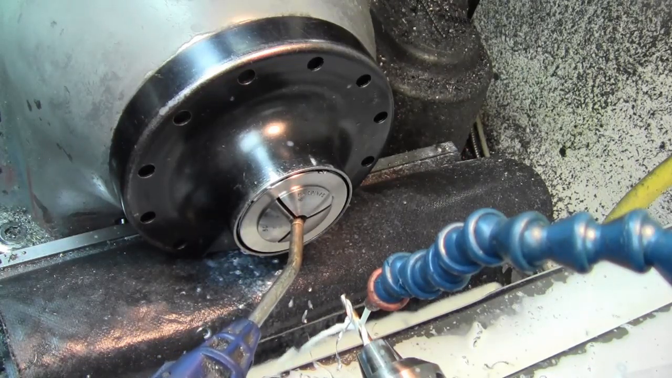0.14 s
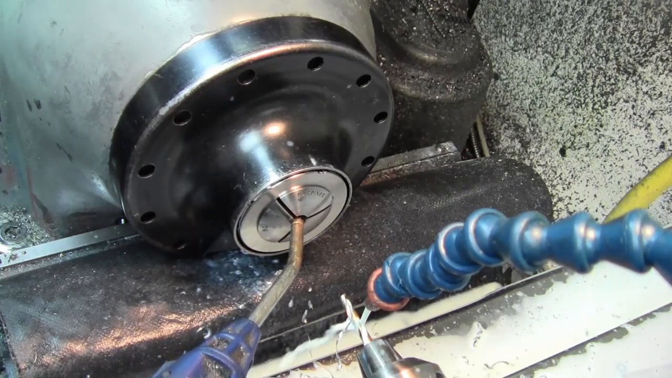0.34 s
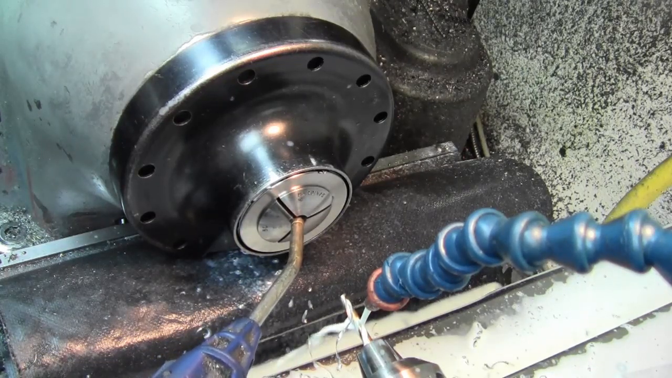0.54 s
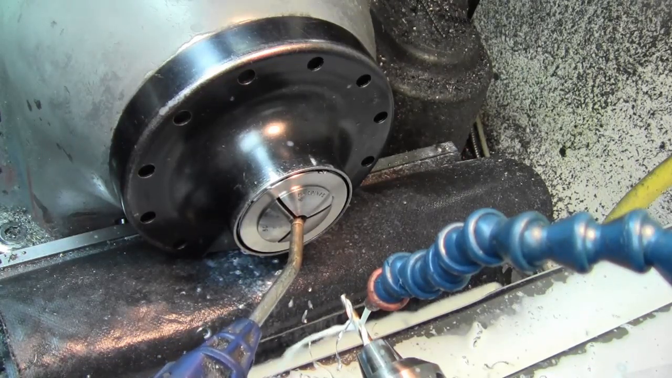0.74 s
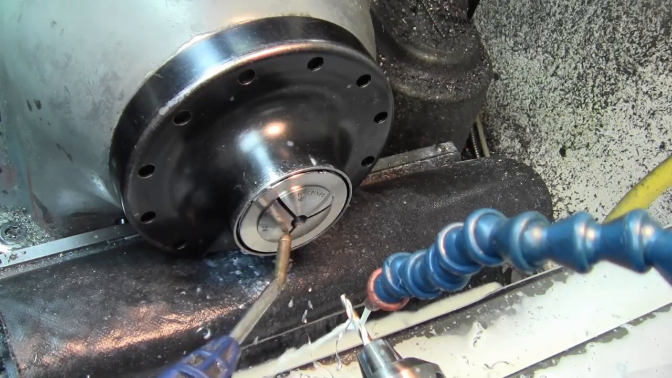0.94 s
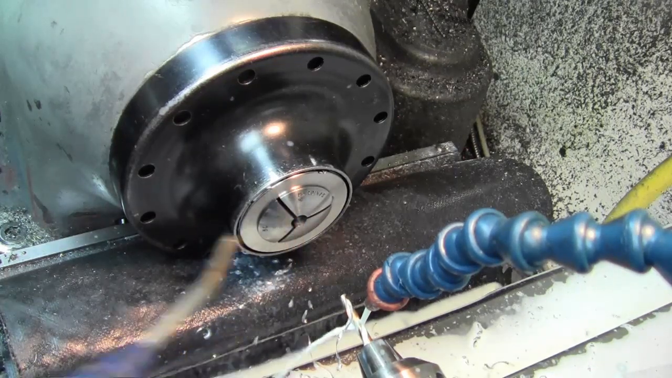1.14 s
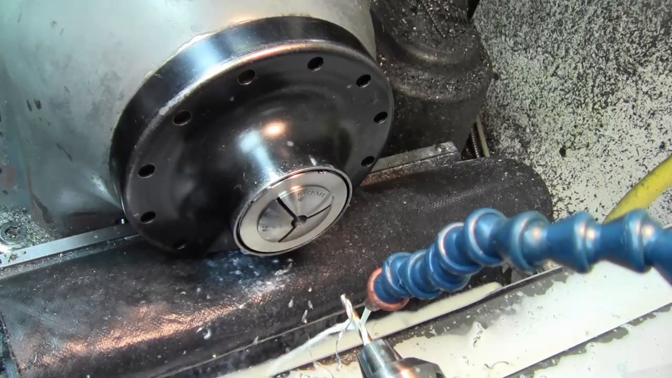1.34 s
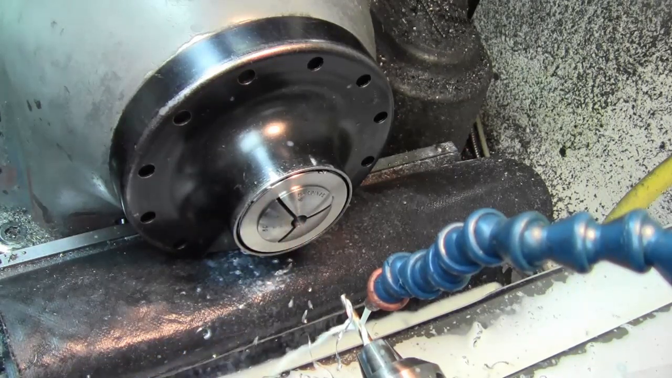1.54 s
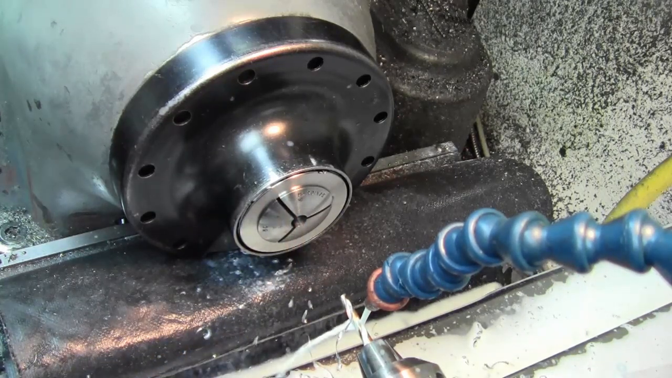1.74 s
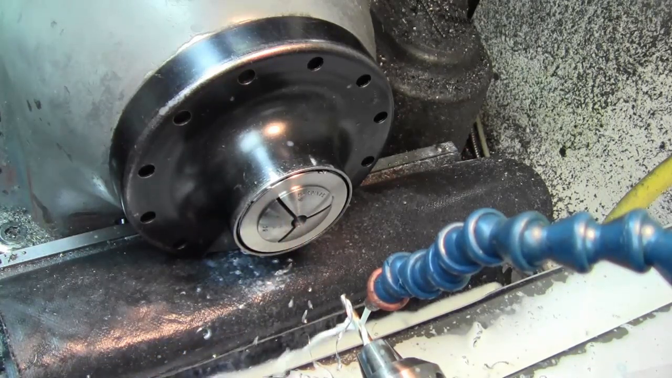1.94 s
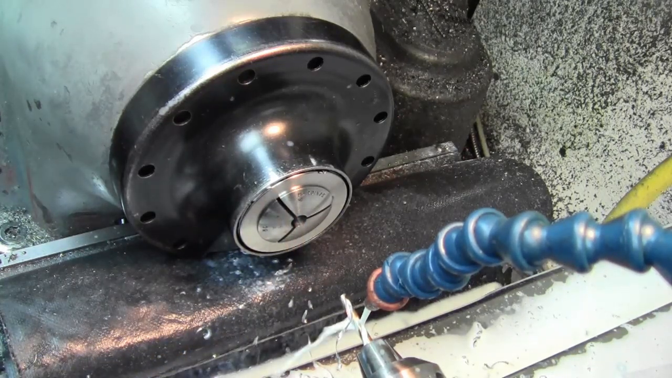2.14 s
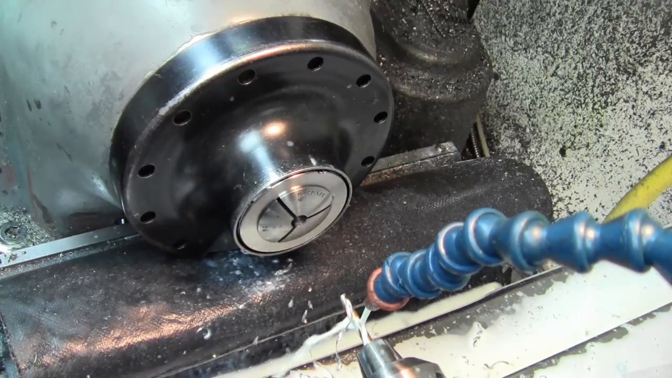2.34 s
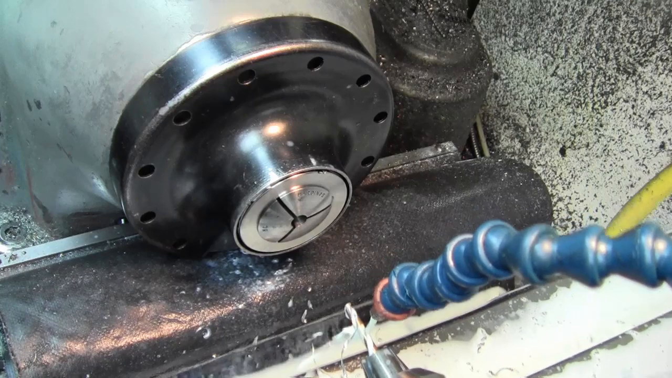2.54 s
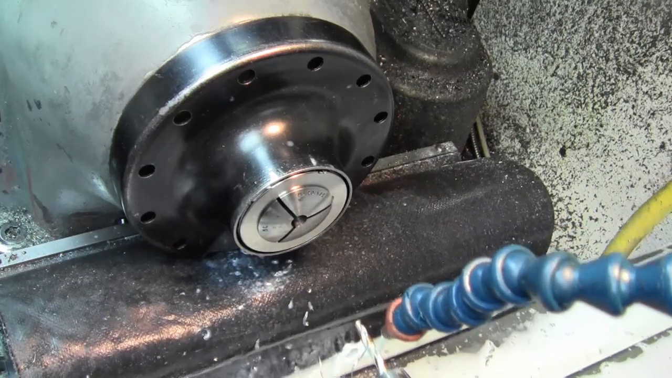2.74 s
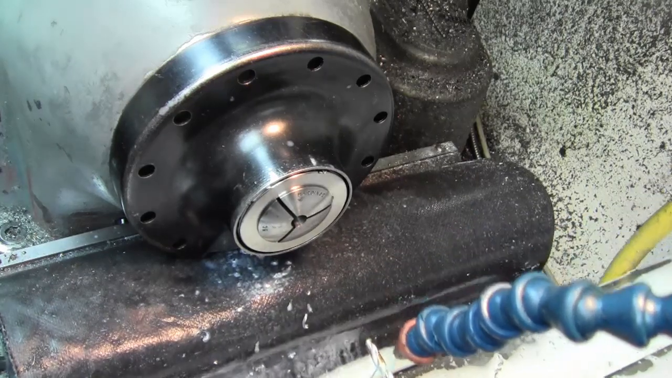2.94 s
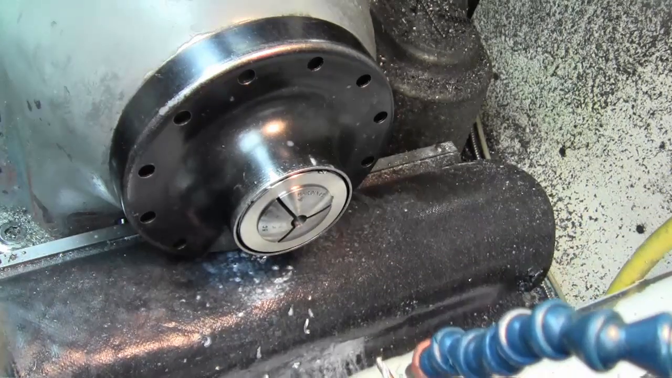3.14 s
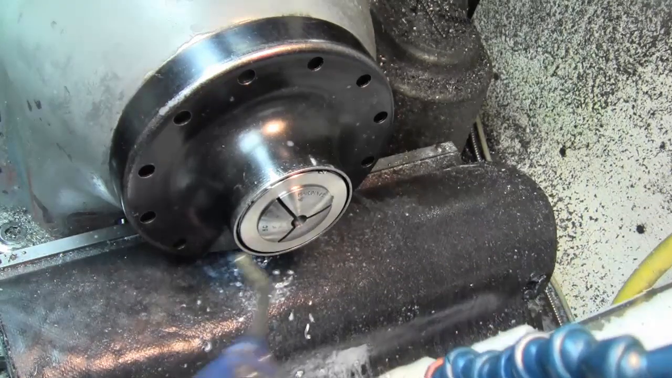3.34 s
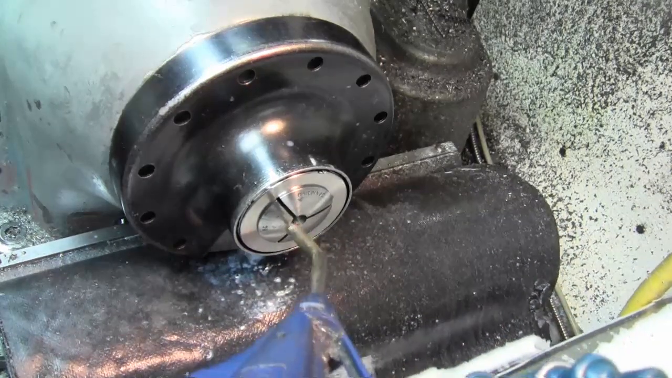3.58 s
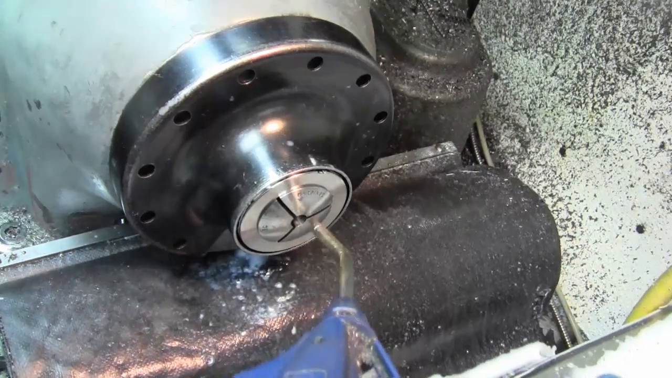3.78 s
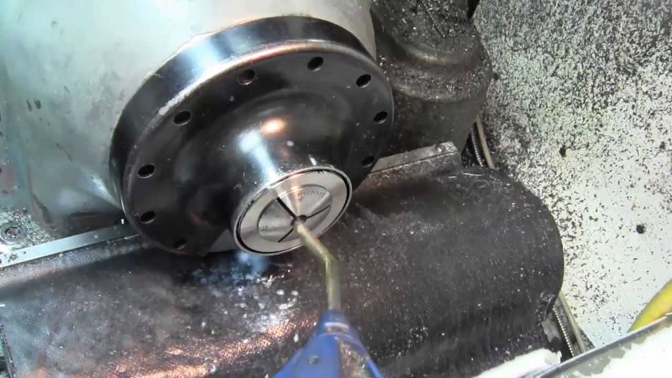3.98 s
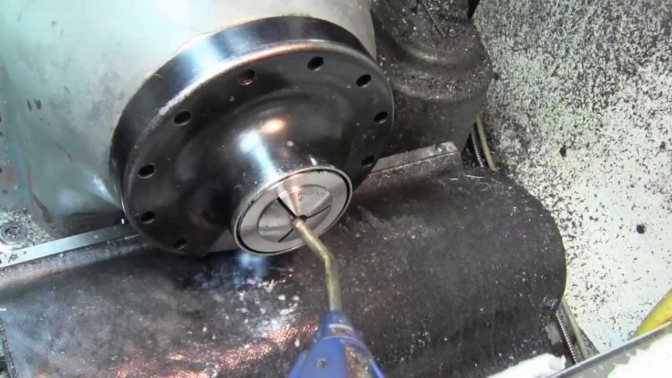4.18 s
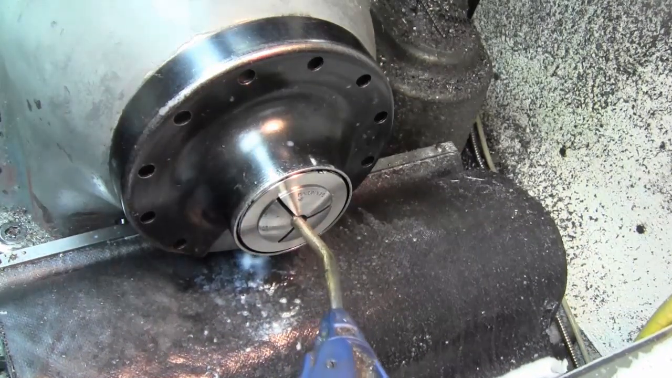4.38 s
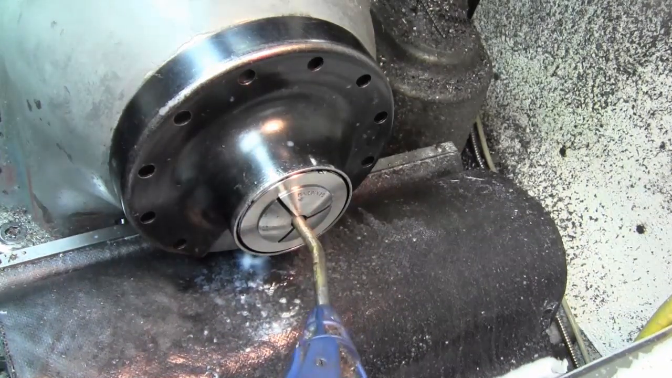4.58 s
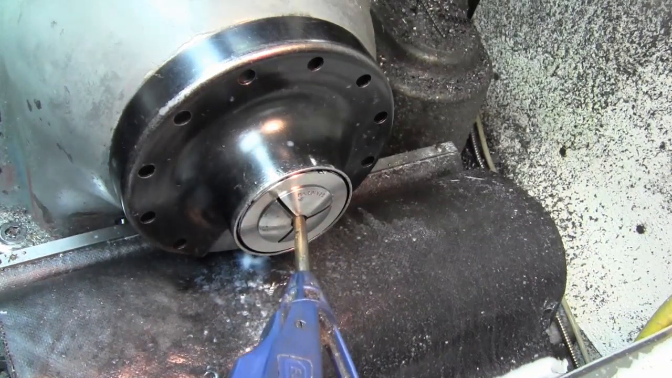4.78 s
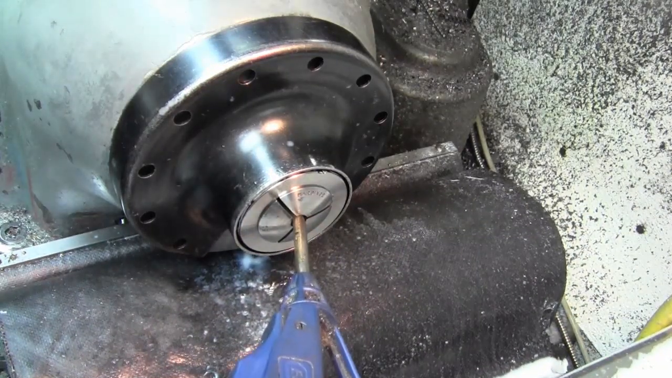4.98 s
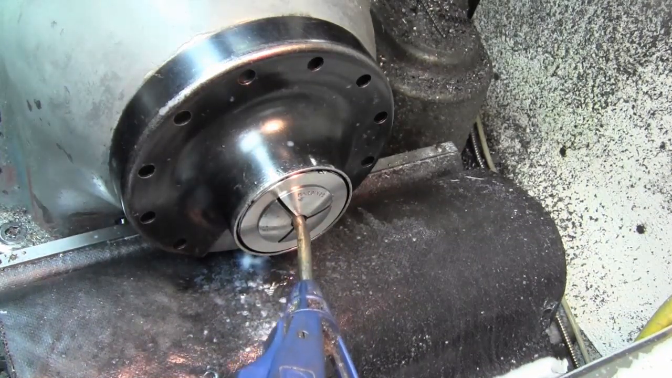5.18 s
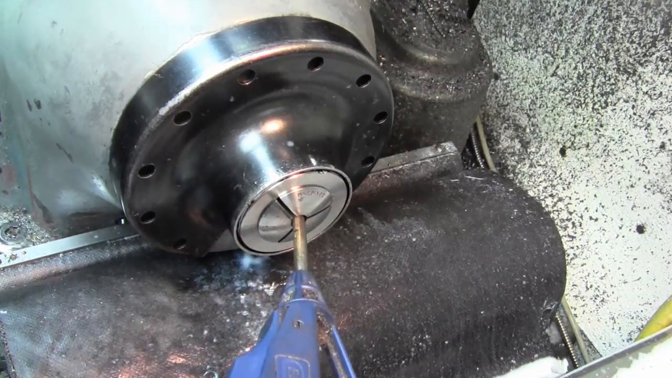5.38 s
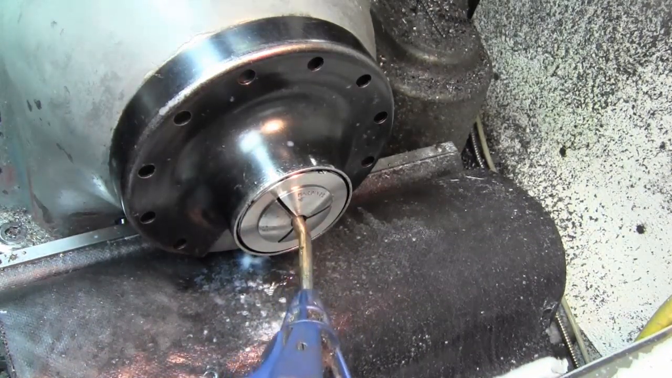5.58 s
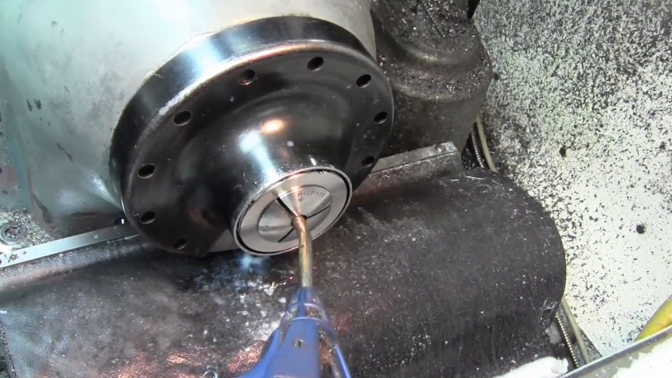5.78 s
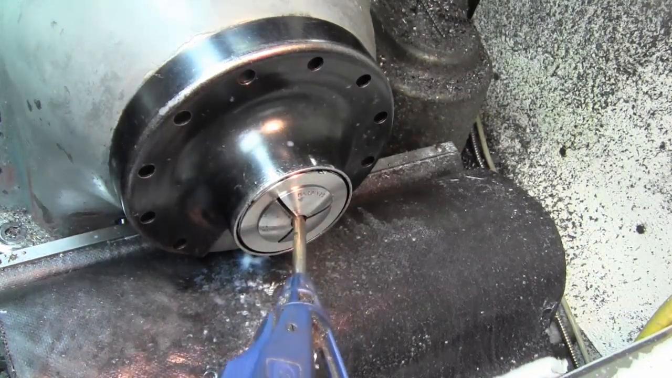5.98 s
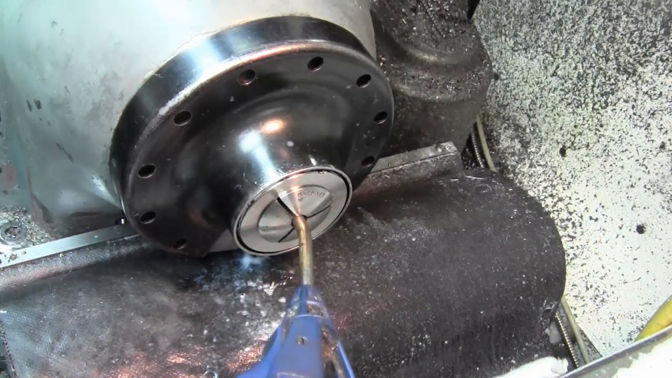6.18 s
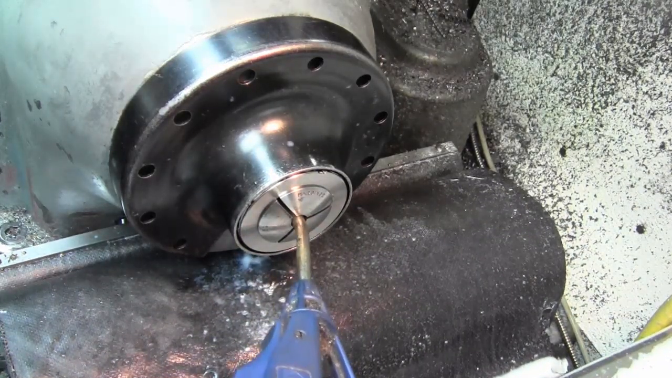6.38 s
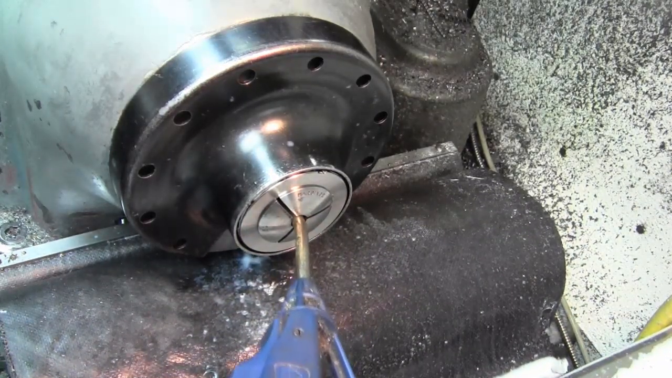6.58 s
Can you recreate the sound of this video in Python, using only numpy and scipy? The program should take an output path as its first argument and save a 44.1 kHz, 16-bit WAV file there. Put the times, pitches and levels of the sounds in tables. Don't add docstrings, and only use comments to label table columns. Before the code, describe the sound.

A loud compressed-air jet hisses on metal, cuts off, machine hum rises with faint bumps and a tick, then a second blast turns from hiss to whistling roar.

```python
import sys
import numpy as np
from scipy import signal
from scipy.io import wavfile
from scipy.ndimage import uniform_filter1d, map_coordinates

SR = 44100
rng = np.random.default_rng(int(sys.argv[2]) if len(sys.argv) > 2 else 0)


def to_wav(sig):
    pcm = np.clip(np.atleast_2d(sig), -1, 1) * 32767
    pcm = np.round(pcm).astype(np.int16)
    wavfile.write(sys.argv[1], SR, pcm.T)


def boost_factor(decibels):
    exponent = np.asarray(decibels, float) / 20
    return 10 ** exponent


N = 291942
HOP, SIZE = 512, 2048
HZ = np.fft.rfftfreq(SIZE, 1 / SR)
FRAMES = np.arange(N // HOP + 5) * HOP / SR

# (valve fully open [s], valve starts to shut [s])
BLASTS = [
    (-1, 1.04),
    (4.128, 7),
]


def evened(x, axis=None):
    return x / np.sqrt(np.mean(abs(x) ** 2, axis=axis, keepdims=True) + 1e-20)


def read(points, hz):
    f, value = np.transpose(points)
    return np.interp(np.log(hz + 1), np.log(f + 1), value)


def drift(rows, across, along):
    field = rng.standard_normal((len(FRAMES), rows)).T
    for _ in range(2):
        field = uniform_filter1d(field, across, 0)
        field = uniform_filter1d(field, along, 1)
    return evened(field)


def colour(table, between_db, waver_db, damping):
    bed, rings = table
    f, width, db = np.transpose(rings)
    width = np.maximum(width, damping * f)
    shape = 1 / (1 + (2 * (HZ[:, None] - f) / width) ** 2) ** 2
    swell = boost_factor(db[:, None] + waver_db * drift(len(f), across=1, along=7)) ** 2
    bed_gain = boost_factor(read(bed, HZ) + between_db)[:, None]
    return np.sqrt(bed_gain ** 2 + shape @ swell)


def pair(magnitude, same, left):
    a, b, c, d = rng.standard_normal((len(FRAMES), len(HZ), 4)).T
    like = np.clip(read(same, HZ), 0, 1)[:, None]
    lean = boost_factor(read(left, HZ) / 2)[:, None]
    one = a + 1j * b
    other = like * one + np.sqrt(1 - like ** 2) * (c + 1j * d)
    return magnitude * np.array([one * lean, other / lean])


def sound_of(z):
    return signal.istft(z, nperseg=SIZE, noverlap=SIZE - HOP)[1][..., :N]


def jet():
    # (frequency [Hz], width [Hz], level [dB])
    rim = ([(71, -82), (120, -71), (245, -10), (390, -14), (500, -8.5), (960, -9), (1320, -2.5),
           (1970, -2.5), (3780, -4), (6000, -7), (9410, -5.5), (11900, -12), (13000, -20), (16000, -46)],
           [(490.4, 41, 0), (757, 70, -20), (1326, 71, 3.5), (1610, 57, -5), (1940, 230, -3),
           (2346, 90, -6), (2790, 85, -3), (3220, 140, -2.5), (4240, 260, -4), (5400, 200, -5),
           (6360, 288, -6.5), (7050, 98, -1.5), (7610, 400, -2), (8650, 365, -12.5), (9360, 380, -1.5)])
    face = ([(71, -70), (120, -57), (175, -44), (380, -24), (690, -27), (930, -28), (1100, -12), (2500, -6),
            (5300, -6), (7720, -1.5), (10200, -6), (12000, -10.5), (12700, -14.5), (13700, -25)],
            [(254.6, 50, -13.5), (507, 90, -9), (600, 42, -13.5), (810, 100, -12.5), (1065, 74, -7),
            (1300, 160, -5.5), (1640, 61, 2), (1902, 65, 1.5), (2460, 110, -6), (3420, 205, -8.5),
            (6000, 400, -5), (7690, 420, 0.5), (8470, 300, 0), (9380, 200, 0.5), (10040, 460, -1.5),
            (10850, 300, -5)])
    bore = [(71, -70), (120, -46), (235, -27.5), (372, -17), (471, -15), (907, -18), (1270, -12),
            (1580, -4.5), (2920, -15.5), (4010, -3), (4890, -10.5), (9050, 2), (10600, -13), (12100, -15),
            (13700, -27)], [(245.8, 16.6, -9.5), (474, 29, -12.5), (750, 57, -16.5), (1055, 44, -9.5),
            (1295, 58, -0.5), (1507, 15, -20), (1593, 40, 1), (1607, 12, 4.5), (1789, 20, -5.5),
            (1933, 18, 3), (1987, 30, -1.5), (2200, 38, -10), (2374, 29, -5), (2475, 13, -2.5),
            (2890, 120, -21), (3533, 44, 1), (3850, 43, -1), (4400, 13, -15.5), (4134, 32, 4.5),
            (4090, 28, -16), (4540, 55, -6.5), (6000, 250, -13), (6730, 66, -9.5), (7600, 310, -3),
            (8500, 500, -6), (9080, 120, 0), (9760, 60, -2)]
    edges_hz = [5500, 2900, 950]
    # (frequency [Hz], likeness [0-1])
    jet_same = [(60, 0.65), (150, 1), (360, 0.84), (890, 0.88), (2190, 0.94), (5400, 0.905), (10500, 0.92),
                (13300, 0.3)]
    # (frequency [Hz], left minus right [dB])
    jet_left = [(60, -5), (180, -2), (520, -2.5), (1530, -2.5), (4510, -2.5), (10500, -1.5), (13300, -4.5)]

    share = bore_share()
    on_face = wandering(colour(face, -2.0, 3.0, .03), .01)
    in_bore = wandering(colour(bore, -6.0, 3.0, .006), .0012)
    second = (1 - share) * on_face + share * in_bore
    aimed = np.where(FRAMES < 2.5, wandering(colour(rim, -2.0, 2.0, .03), .01), second)
    aimed = aimed * closing_gap()
    aimed = aimed * boost_factor(1.02 * drift(len(HZ), across=14, along=3))
    aimed = aimed * boost_factor(1.8 * drift(len(HZ), across=2, along=60))

    above = [1 / (1 + (edge / (HZ + 1)) ** 16) for edge in edges_hz]
    masks = np.diff([0 * HZ] + above + [0 * HZ + 1], axis=0)
    z = pair(moves(), jet_same, jet_left)
    out = np.zeros((2, N))
    for mask, db in zip(masks, strengths(np.arange(N) / SR)):
        part = evened(sound_of(z * evened(aimed * mask[:, None], axis=0)))
        out += part * uniform_filter1d(boost_factor(db), size=300)
    return out


def bore_share():
    # (time [s], share of the jet inside the bore [0-1])
    into_bore = [
        (4.6, 0.052),
        (4.75, 0.66),
        (4.85, 0.97),
    ]
    return np.clip(np.interp(FRAMES, *np.transpose(into_bore)), 0, 1)


def wandering(magnitude, share):
    bins, frames = np.indices(magnitude.shape)
    slid = bins * (1 + share * drift(len(HZ), across=60, along=9))
    return map_coordinates(magnitude, [slid, frames], order=1, mode="nearest")


def closing_gap():
    from_s, to_s, from_hz, to_hz, gap_db = 4.74, 4.97, 1850, 4000, 5
    closing = np.clip((FRAMES - from_s) / (to_s - from_s), 0, 1)
    gap_hz = from_hz + (to_hz - from_hz) * closing
    peak = np.exp(-((HZ[:, None] - gap_hz) / 600) ** 2)
    return boost_factor(gap_db * np.sin(np.pi * closing) * peak)


def moves():
    # (time [s], half length [s], level [dB], centre frequency [Hz])
    hand_moves = [(.19, .05, 2.5, 3000), (.62, .03, -4, 900), (4.15, .03, 12, 2900), (4.235, .03, 10, 2100),
                  (4.35, .045, -5, 8500), (4.46, .05, 4, 1600), (4.52, .05, -5, 450),
                  (4.5, .025, 2.5, 9500), (4.62, .07, -8, 8000), (4.7, .04, 3, 1600), (4.74, .05, -5, 7000),
                  (4.765, .012, -3, 2500), (4.795, .02, 5, 2000), (4.85, .03, -2, 8500),
                  (4.91, .035, 4.5, 2000), (5.0, .055, -6.5, 2000), (5.75, .35, 2.1, 1500),
                  (6.12, .07, 4, 2200), (6.38, .15, -3.5, 3700)]
    reach_octaves = .85
    total_db = 0
    for s, half, db, hz in hand_moves:
        in_pitch = np.exp(-(np.log2((HZ + 1) / hz) / reach_octaves) ** 2)
        in_time = np.exp(-((FRAMES - s) / half) ** 2)
        total_db = total_db + db * np.outer(in_pitch, in_time)
    return boost_factor(total_db)


def strengths(t):
    # (hiss [dB], slot whistle [dB], bore roar [dB], low wash [dB])
    on_rim = (-17.2, -25.5, -25, -34)
    on_face = (-15.5, -28, -28.5, -37)
    in_bore = (-20, -22, -20, -34)
    gusts_db = [
        [.6],
        [.8],
        [.8],
        [1.8],
    ]
    open_db_per_s, shut_db_per_s = 600, 850

    share = bore_share()
    second = np.outer(on_face, 1 - share) + np.outer(in_bore, share)
    db = np.where(FRAMES < 2.5, np.array(on_rim)[:, None], second)
    db = db + gusts_db * drift(4, across=1, along=5)
    valve = []
    for start, end in BLASTS:
        slope = np.minimum(open_db_per_s * (t - start), shut_db_per_s * (end - t))
        valve.append(np.minimum(slope, 0))
    return np.array([np.interp(t, FRAMES, row) for row in db]) + np.max(valve, axis=0)


def shop(x):
    # (frequency [Hz], t60 [s])
    shop_t60 = [
        (200, 0.23),
        (1500, 0.57),
        (6000, 0.44),
        (12000, 0.28),
    ]
    hz, t, z = signal.stft(rng.standard_normal((2, SR)), SR, nperseg=256)
    decay = boost_factor(-60 * t / read(shop_t60, hz)[:, None])
    tail = signal.istft(z * decay, SR, nperseg=256)[1]
    tail = 1.2 * tail[:1] + 0.27 * tail
    return signal.fftconvolve(x.mean(0)[None], tail / np.linalg.norm(tail[0]), axes=1)[:, :N]


def tick():
    # (frequency [Hz], level [dB], t60 [s])
    tip = [(1100, -9, .012), (2360, -13, 0.0079), (3640, -5.5, 0.009), (4460, -5, 0.0083),
           (6300, -8, 0.0068), (7170, -7, .008), (8100, -5.5, .007), (9700, -2, 0.0034),
           (11200, -17, 0.0044)]
    tick_s, tick_db = 3.8663, -3.5
    out = np.zeros(N)
    u = np.arange(2000) / SR
    ring = sum(boost_factor(db - 60 * u / t60) * np.cos(2 * np.pi * hz * (u - .00025)) for hz, db, t60 in tip)
    ring = -ring * np.clip(u / .0003, 0, 1) ** 2
    ring = ring / abs(ring).max()
    knock = boost_factor(-60 * u / 0.014) * np.sin(2 * np.pi * 1700 * u)
    for after, db, sound in [(0, 3.5, ring), (.0012, -9, ring), (.003, -19, knock)]:
        out[round((tick_s + after) * SR):][:len(u)] += boost_factor(tick_db + db) * sound
    return out


def bumps():
    # (time [s], level [dB], lowest [Hz], highest [Hz], t60 [s])
    panel_bumps = [(1.83, -39, 500, 2200, .12), (2.11, -49, 500, 1900, .15), (2.575, -22.5, 70, 130, .3),
                   (2.649, -30, 300, 350, .37), (2.739, -30, 290, 350, .46), (3.128, -35, 40, 130, .17),
                   (2.125, -46, 6000, 9900, .25), (3.19, -22, 243, 1460, .1), (3.218, -30.5, 227, 290, .26),
                   (3.51, -32.5, 1055, 1077, 1.01), (3.749, -26.5, 277, 600, .17),
                   (3.8, -26.5, 280, 600, .13)]
    rise_share = .033
    out = np.zeros(N + SR)
    u = np.arange(SR // 2) / SR
    for s, db, low_hz, high_hz, t60 in panel_bumps:
        band = signal.butter(3, [low_hz, high_hz], "bandpass", fs=SR, output="sos")
        puff = evened(signal.sosfilt(band, rng.standard_normal(len(u))))
        rise = 1 - np.exp(-u / (rise_share * t60))
        out[round(s * SR):][:len(u)] += boost_factor(db - 60 * u / t60) * rise * puff
    return out[:N]


def machine():
    # (frequency [Hz], width [Hz], level [dB])
    casing_modes = ([(24, -51), (55, -25), (100, -9.5), (260, -6.5), (450, -3.5), (740, -4.5), (1360, -11),
                    (1750, -20), (2800, -19), (4400, -10), (6250, -27.5), (7700, -24.5), (8800, -33),
                    (9500, -27), (11000, -29.5), (12500, -50)], [(104, 32, 3.5), (176, 15, -1),
                    (242, 53, 1), (350, 63, 1.5), (526, 42, 7), (1063, 56, 1), (1290, 56, -4),
                    (1630, 110, -22), (1900, 80, -13.5), (2320, 170, -9.5), (3020, 45, -22),
                    (3154, 60, -16.5), (3460, 76, -15), (3960, 77, -8), (4478, 140, -4.5), (4900, 20, -18),
                    (4940, 25, -17), (5600, 78, -18), (6000, 76, -24), (6900, 350, -21.5)])
    # (frequency [Hz], level [dB])
    whine_tones = [(123.8, -51), (317.6, -53.5), (355.3, -37), (543.7, -43.5), (979.8, -48), (1061, -44.5),
                   (1109, -46), (1270, -44.5), (1314, -50), (1351, -39), (1556, -56), (1653, -53)]
    # (frequency [Hz], likeness [0-1])
    machine_same = [(60, 1), (180, 0.98), (520, 0.99), (1530, 0.72), (4510, 0.69), (13300, 0.34)]
    # (frequency [Hz], left minus right [dB])
    machine_left = [(60, 5), (180, -3.5), (520, -3.5), (1530, -2), (4510, -5), (13300, 6)]
    machine_db, shaft_hz = -31, 23.59

    t = np.arange(N) / SR
    casing = colour(casing_modes, -2.5, 1.6, 0.0072)
    flow = evened(sound_of(pair(casing, machine_same, machine_left)))

    turns = shaft_hz * t + 0.012 * np.interp(t, FRAMES, drift(1, across=1, along=40)[0])
    pattern = rng.standard_normal(1024)
    rattle = np.interp(turns % 1, np.arange(1024) / 1024, pattern, period=1)
    passes = casing / (1 + (900 / (HZ[:, None] + 1)) ** 4)
    z = signal.stft(rattle, nperseg=SIZE, noverlap=SIZE - HOP)[2]
    rattle = evened(sound_of(z * passes[:, :N // HOP + 2]))

    whines = np.zeros(N)
    waver = drift(len(whine_tones), across=1, along=9)
    for (hz, db), w in zip(whine_tones, waver):
        level = boost_factor(db + 0.81 * np.interp(t, FRAMES, w))
        whines += level * np.sin(2 * np.pi * (hz * t + rng.random()))
    solid = boost_factor(machine_db - 6.5) * rattle + whines
    hum = boost_factor(machine_db - 5.0) * flow + solid * boost_factor([[-1.0], [1.1]])
    return hum * boost_factor(passed(t))


def passed(t):
    ducked_db, freed_db, recover_db_per_s, grab_s = -15, -.5, 14, .07
    climb = np.clip(ducked_db + recover_db_per_s * (t - BLASTS[0][1]), ducked_db, freed_db)
    grab = np.clip((t - BLASTS[1][0]) / grab_s, 0, 1)
    return climb + grab * (ducked_db - climb)


def scene():
    air = jet()
    near = (bumps() + tick()) * boost_factor([[-1.1], [1.1]])
    return air + boost_factor(-16) * shop(air) + machine() + near


def thinned(x):
    # (frequency [Hz], level against the whole frame [dB])
    rounding = [(40, -66), (100, -43), (170, -37), (400, -36), (950, -35), (1400, -50), (6000, -49),
                (8000, -46), (9000, -44), (11000, -43), (12200, -42), (12800, -37), (14000, -35)]
    how = dict(window="cosine", nperseg=4096, noverlap=2048)
    hz, t, z = signal.stft(x, SR, **how)
    loudness = np.sqrt((abs(z) ** 2).sum(1, keepdims=True)) + 1e-9
    uneven = rng.standard_normal((len(t), len(hz) // 8 + 1)).T
    uneven = np.repeat(uneven, 8, axis=0)[:len(hz)]
    step = loudness * boost_factor(read(rounding, hz)[:, None] + 3.0 * uneven)
    size = np.floor(abs(z) / step + 0.47) * step
    return signal.istft(size * z / (abs(z) + 1e-20), SR, **how)[1][:, :N]


def top_cut(x):
    return signal.sosfilt(signal.butter(12, 13870, fs=SR, output="sos"), x)


def record(dry):
    rounded = dry / (1 + abs(dry) ** 6) ** (1 / 6)
    mix = thinned(rounded)
    return top_cut(mix)


dry = scene()
out = record(dry)
to_wav(out)
```